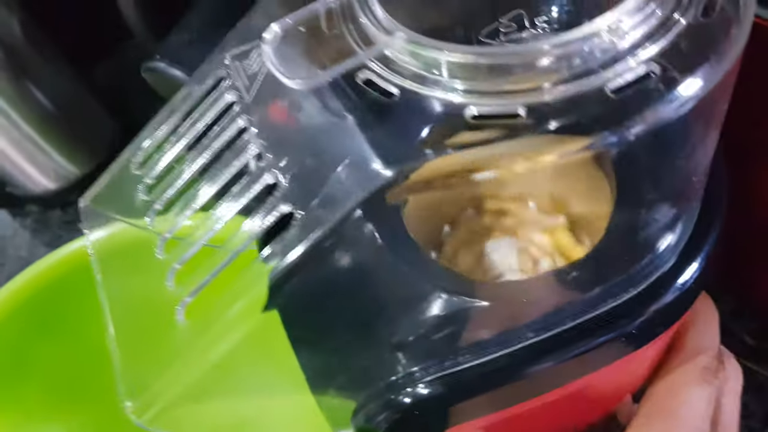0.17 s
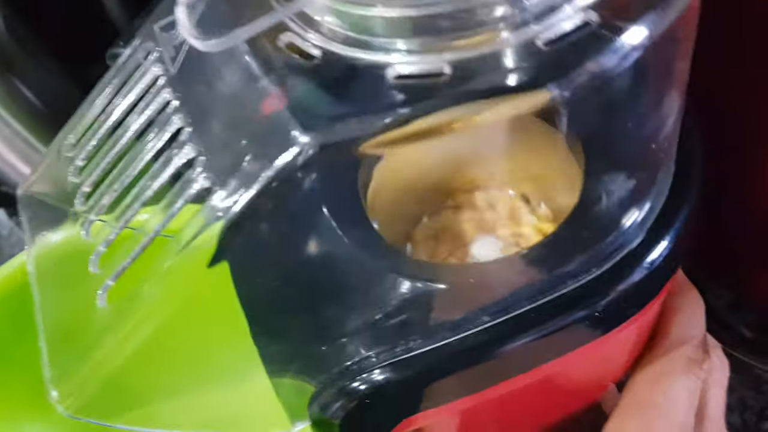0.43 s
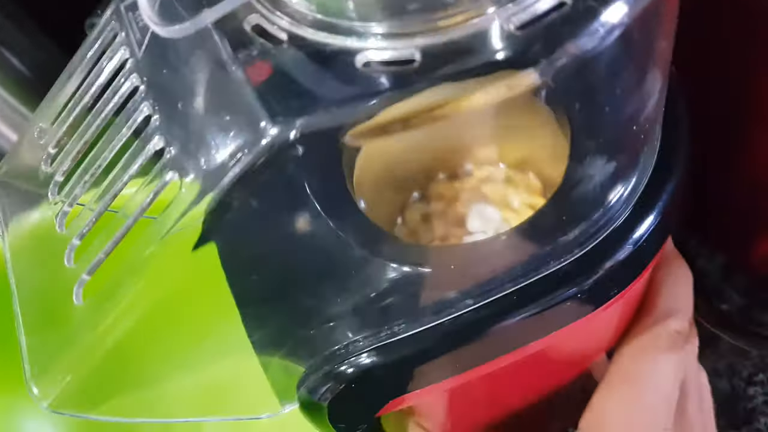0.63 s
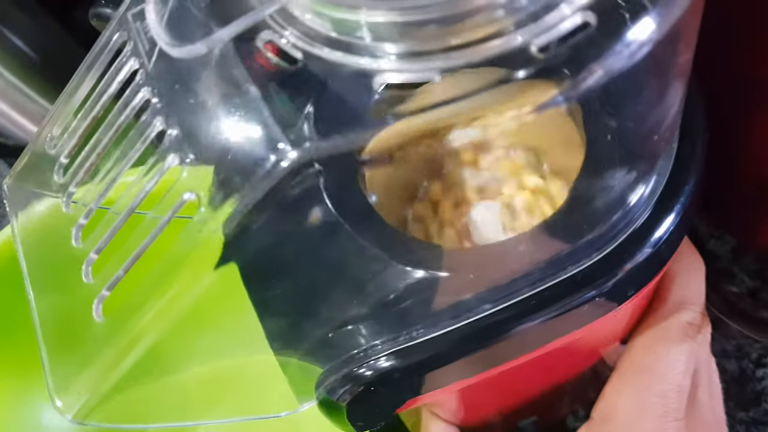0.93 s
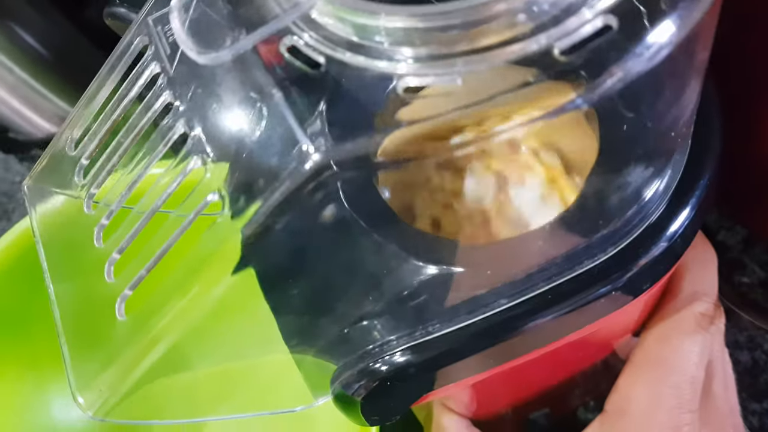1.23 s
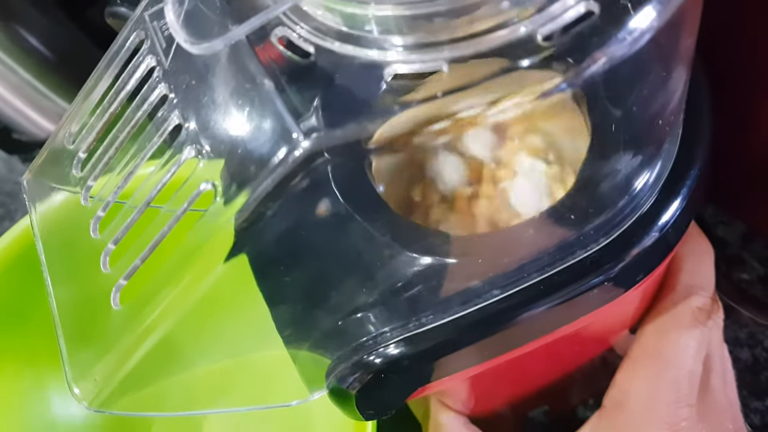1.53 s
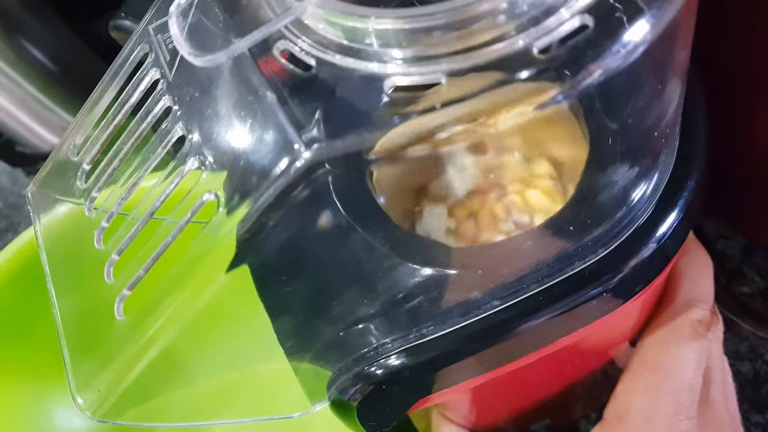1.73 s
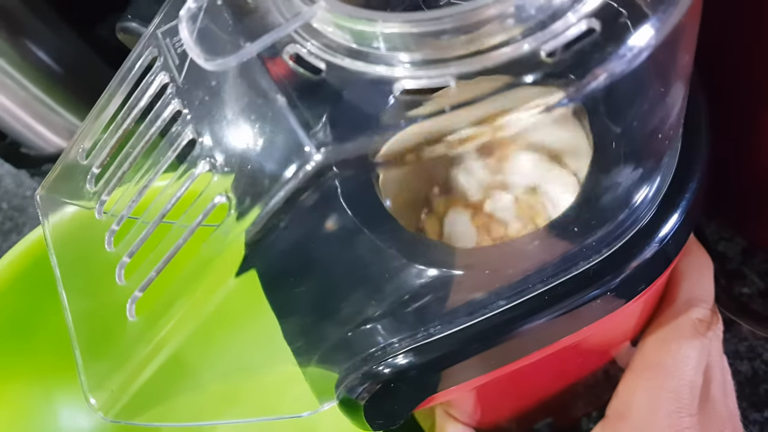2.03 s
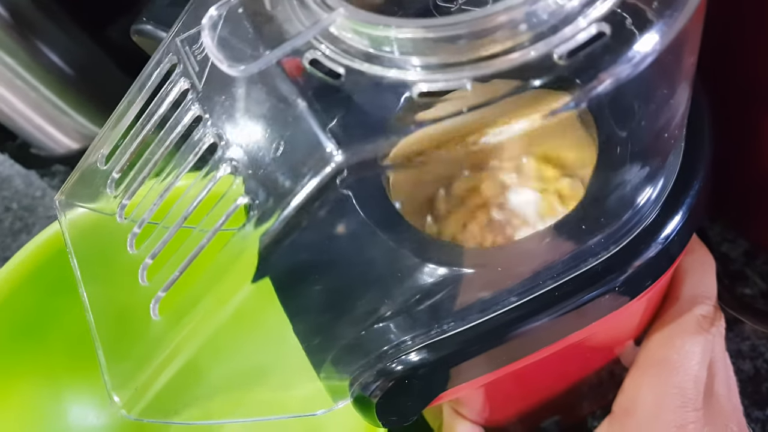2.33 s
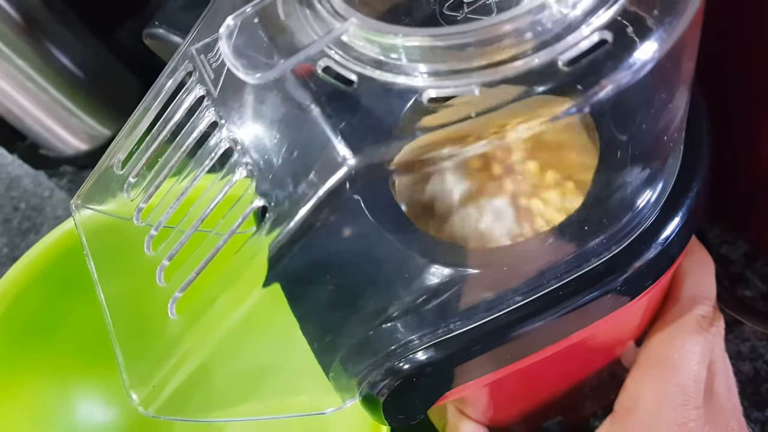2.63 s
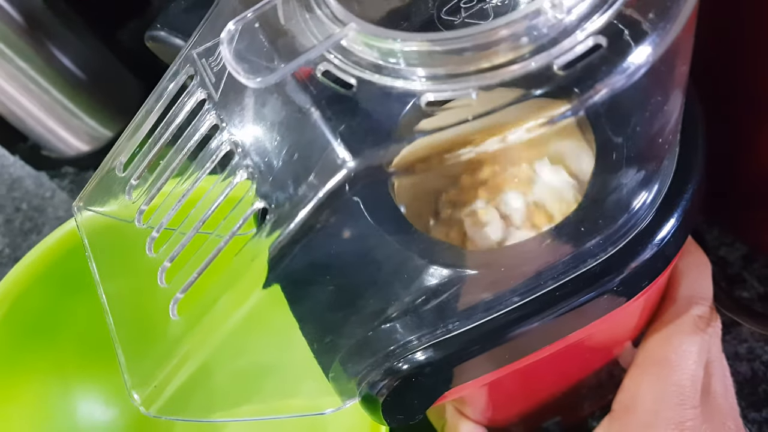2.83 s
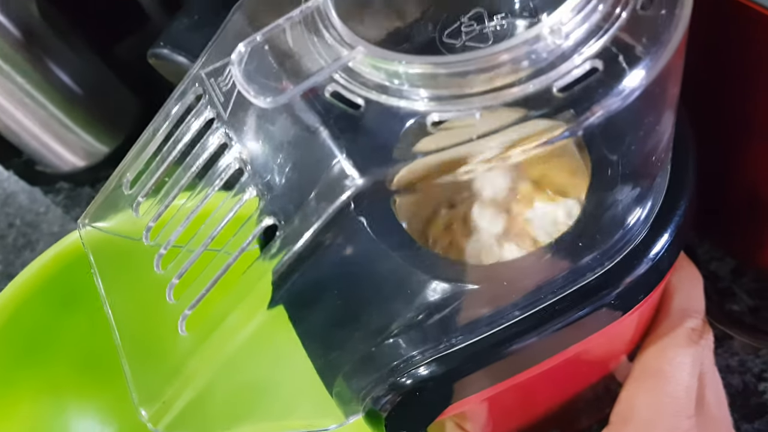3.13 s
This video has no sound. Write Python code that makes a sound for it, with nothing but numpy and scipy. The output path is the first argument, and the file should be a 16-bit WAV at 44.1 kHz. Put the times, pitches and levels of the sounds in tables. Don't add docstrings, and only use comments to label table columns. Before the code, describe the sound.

Close stereo pickup of a hot-air popcorn maker indoors: steady airy roar, pitched motor drone and fine kernel rattle. Three loud snapping pops come before midway, each squashing the level, then weaker snaps and recovery.

```python
import sys
import numpy as np
from scipy import signal
from scipy.fft import rfft, irfft
from scipy.io import wavfile

SR = 44100
rng = np.random.default_rng(int(sys.argv[2]) if len(sys.argv) > 2 else 0)


def convert_level_to_amplitude(level_db):
    exponent = np.asarray(level_db, float) / 20
    return 10 ** exponent


def transcribe(u):
    v = np.clip(np.atleast_2d(u).T, -1, 1)
    q = np.round(v * 32767).astype(np.int16)
    wavfile.write(sys.argv[1], SR, q)


N = 145089

# (time [s], level [dB])
RECORDER_GAIN = [(0, -24), (.25, -21), (.55, -19.5), (1.0, -18.5), (1.207, -18.5), (1.228, -29),
                 (1.245, -21), (1.315, -23), (1.335, -28), (1.36, -25), (1.5, -27.5), (1.525, -28),
                 (2.0, -29), (2.35, -29), (2.62, -27.5), (2.8, -23), (3.05, -20.5), (3.29, -20)]
# (frequency [Hz], density [dB per Hz])
RUMBLE_SPECTRUM = [(15, -42), (50, -35), (75, -23), (98, -11), (150, -12.5), (200, -12), (255, -4.5),
                   (330, -8)]
# (frequency [Hz], density [dB per Hz])
ROAR_SPECTRUM = [(330, -7), (480, -5.5), (600, -2.5), (800, 2), (1100, 0), (1500, -5), (1950, -5.5),
                 (2300, -16.5)]
# (frequency [Hz], density [dB per Hz])
HISS_SPECTRUM = [(1350, -71), (2300, -5), (4090, -1), (4890, -5), (5770, -13.5), (11400, -17), (14900, -22),
                 (15800, -20), (16400, -46)]
# (frequency [Hz], share [0-1])
SHARED_AIR = [(30, 0.5), (100, 0.93), (400, 1), (800, 0.86), (1300, 0.43), (1800, 0.81), (3000, 0),
              (15000, 0)]
# (frequency [Hz], lead [rad])
LEFT_LEAD = [(0, .1), (500, .4), (860, 1.1), (1000, -1.3), (1300, 0), (2070, 3.1), (2500, 9), (16000, 120)]
# (frequency [Hz], left-right [dB])
AIR_LEAN = [(30, 2), (100, 0), (350, .5), (600, 4), (780, -1), (1150, 7), (2400, 2), (15000, 1.5)]
# (multiple of the turning rate [1], left level [dB], right level [dB], left lead [rad],
# gain once the microphone has shifted [dB])
MOTOR_ORDERS = [(1, 0, 0, -.1, 0), (2, .8, -2.5, .6, -1.2), (3, -11, -6, 1.0, -3.0),
                (4, -12, -22, -1.2, -3.0), (5, -13, -15, .2, -1.5), (6, -11, -19, 2.0, 1.5),
                (7, -16, -19, -1.3, -4), (8, -29, -29, .3, 0), (9, -24, -27, .4, -4), (10, -28, -28, .3, 0),
                (13, -24, -24, .2, -3), (14, -27, -26, .3, 0), (15, -19, -15, 2.5, -4),
                (16, -24, -27, .7, 1), (17, -23, -23, 1.0, 9), (18, -32, -32, .3, 0),
                (20, -25, -22, -2.4, -6), (22, -41, -41, .3, 0), (30, -37, -37, .3, 0)]
# (frequency [Hz], width [Hz], level [dB], left-right [dB])
HOUSING_WHISTLES = [(763, 10.0, -9, -10), (808, 4.5, -14.5, 11), (911, 8, -31, 34), (666, 39, -17, 19),
                    (413.7, 23, -25.5, 14), (1716, 25, -29.5, 29), (2464, 60.0, -35, 36),
                    (6700, 230, -30.5, 10)]
# (time [s], peak [dB], centre [Hz], tail T60 [s], left-right [dB])
BURSTS = [
    (1.2205, -16.5, 11200, 0.39, 5),
    (1.3302, -13, 8800, 0.21, 3.5),
    (1.516, -13, 10000, .15, 4.5),
    (1.3410, -24, 4500, .03, 6),
    (1.5935, -29, 5500, .05, 2.5),
    (2.5868, -23, 10500, .05, 5),
    (2.594, -28, 13500, .04, 4),
    (2.7162, -30, 10000, .05, 2.5),
    (.435, -30, 13000, .08, 5),
]

MOTOR_HZ = 263.05


def column(rows, k, at):
    rows = np.array(rows, float)
    return np.interp(at, rows[:, 0], rows[:, k])


def at_hz(points, hz):
    points = np.array(points)
    return np.interp(np.log(hz), np.log(points[:, 0]), points[:, 1])


def rms_one(x):
    return x / np.sqrt(np.mean(x ** 2) + 1e-20)


def drift(rate):
    r = np.exp(-80 * np.pi * rate / SR)
    slow = signal.lfilter([1], [1, -2 * r, r * r], rng.standard_normal(N // 40 + 2002))
    slow = slow[2000:]
    return np.interp(np.arange(N) / 40, np.arange(len(slow)), rms_one(slow))


def resonate(x, hz, width):
    r = np.exp(-np.pi * width / SR)
    return signal.lfilter([1, 0, -1], [1, -2 * r * np.cos(2 * np.pi * hz / SR), r * r], x + 1e-18)


def panned(x, db):
    return x * convert_level_to_amplitude(np.array([[.5], [-.5]]) * db)


def shaft_angle():
    return 2 * np.pi * MOTOR_HZ * np.arange(N) / SR


def moving_air(spectrum, patchy_db):
    echo_s, echo_share = [[0.00141, .0031], [0.001225, .0038]], 0.13
    blade_depth = 0.05
    hz = np.maximum(np.arange(N // 2 + 1) * SR / N, 1)
    left, other = rfft(rng.standard_normal((2, N)))
    share = np.clip(at_hz(SHARED_AIR, hz), 0, 1)
    common = share * left * np.exp(-1j * column(LEFT_LEAD, 1, hz))
    pair = np.array([left, common + np.sqrt(1 - share ** 2) * other])
    pair = panned(pair * convert_level_to_amplitude(at_hz(spectrum, hz)), at_hz(AIR_LEAN, hz))
    echoes = 1 + echo_share * np.exp(-2j * np.pi * hz * np.array(echo_s)[..., None])
    pair = pair * np.abs(echoes).prod(axis=1)

    low, high = spectrum[0][0], spectrum[-1][0]
    centres = np.linspace(np.log(low), np.log(high), 10)
    inside = (hz >= low) * (hz < high)
    out, together = 0, drift(1.0)
    for k in range(len(centres)):
        band = np.sqrt(np.interp(np.log(hz), centres, np.arange(len(centres)) == k)) * inside
        flicker = convert_level_to_amplitude(patchy_db * (0.29 * together + drift(10.3)))
        out = out + flicker * irfft(pair * band, N)
    return rms_one(out) * (1 + blade_depth * np.cos(shaft_angle()))


def fan():
    rumble = convert_level_to_amplitude(-19.5) * moving_air(RUMBLE_SPECTRUM, patchy_db=4.0)
    roar = convert_level_to_amplitude(-1) * moving_air(ROAR_SPECTRUM, patchy_db=0.87)
    hiss = convert_level_to_amplitude(-6.5) * moving_air(HISS_SPECTRUM, patchy_db=1.0)
    return rumble + roar + hiss


def whistles():
    narrow_hz, steadying = 20, .6
    out = 0
    for hz, width, db, pan_db in HOUSING_WHISTLES:
        tone = resonate(resonate(rng.standard_normal(N), hz, width), hz, width)
        if width < narrow_hz:
            envelope = np.abs(signal.hilbert(tone)) + 1e-9
            tone = tone / envelope ** steadying
        out = out + convert_level_to_amplitude(db) * panned(rms_one(tone), pan_db)
    return out


def hum():
    waver_db, waver_growth, waver_top_db, waver_per_s = .12, 1.3, 2.2, 5
    phase_wander = .006
    shift_s, shift_takes_s = 2.55, .35
    early_dip_db, early_s = -6, 0.25
    t, angle = np.arange(N) / SR, shaft_angle()
    shifted = np.clip((t - shift_s) / shift_takes_s, 0, 1)
    out = np.zeros((2, N))
    for order, left_db, right_db, lead, shift_db in MOTOR_ORDERS:
        k = round(order)
        phase = k * angle + phase_wander * k * drift(0.7) - (k > 1) * np.pi / 2
        depth_db = np.minimum(waver_db * k ** waver_growth, waver_top_db)
        level_db = depth_db * drift(waver_per_s) + shift_db * shifted
        if k == 1:
            level_db = level_db + early_dip_db * np.exp(-t / early_s)
        ports = convert_level_to_amplitude(np.array([[left_db], [right_db]]))
        out += np.sqrt(2) * convert_level_to_amplitude(level_db) * ports * np.cos(phase + np.array([[.5], [-.5]]) * lead)
    return out


def ticks():
    ticks_per_s, level_db, ring_cycles = 170, -18.5, 24
    sizes = convert_level_to_amplitude(1.7 * np.minimum(rng.exponential(1, N), 3.0)) * rng.choice([-1, 1], N)
    struck = rng.random(N) < ticks_per_s / SR
    spot = rng.integers(0, 12, N)
    out = 0
    for k, hz in enumerate(np.geomspace(2700, 7500, 12)):
        ring = resonate(sizes * struck * (spot == k), hz, 0.94 * hz / ring_cycles)
        out = out + panned(ring, 18.0 * np.sin(k * k))
    return convert_level_to_amplitude(level_db) * rms_one(out)


def pops():
    rise_s, octaves = .00015, 0.98
    spike_db, spike_t60_s, crack_t60_s, tail_db = -5, .007, .035, -13
    snap_db, snap_hz = 6, 1100
    thump_db, thump_hz, thump_t60_s = -1, 85, .09
    out, t = np.zeros((2, N + SR)), np.arange(SR // 2) / SR
    for s, db, hz, t60, pan_db in BURSTS:
        edges = np.clip(hz * 2 ** (np.array([-.5, .5]) * octaves), 500, .44 * SR)
        band = signal.butter(3, edges, "band", fs=SR, output="sos")
        noise = rms_one(signal.sosfilt(band, rng.standard_normal((2, len(t)))))
        spike = convert_level_to_amplitude(spike_db - 60 * t / spike_t60_s)
        crack = convert_level_to_amplitude(-60 * t / crack_t60_s)
        steam = convert_level_to_amplitude(tail_db - 60 * t / t60)
        shape = (1 - np.exp(-t / rise_s)) * (spike + crack + steam)
        swing = np.cos(2 * np.pi * snap_hz * t + np.arctan(2 / np.pi))
        snap = -convert_level_to_amplitude(snap_db) * np.exp(-t * snap_hz * 4) * swing
        thump = t60 ** 2 * convert_level_to_amplitude(thump_db - 60 * t / thump_t60_s) * np.sin(2 * np.pi * thump_hz * t)
        level = convert_level_to_amplitude(db - column(RECORDER_GAIN, 1, s))
        i = int(s * SR)
        out[:, i:i + len(t)] += level * panned(shape * noise + snap + thump, pan_db)
    return out[:, :N]


def scene():
    return fan() + whistles() + hum() + ticks() + pops()


def roll_off(x):
    return signal.sosfilt(signal.butter(12, 16500, fs=SR, output="sos"), x)


def record(dry):
    x = dry * convert_level_to_amplitude(column(RECORDER_GAIN, 1, np.arange(N) / SR))
    limited = 1.5 * np.tanh(x / 1.5)
    top_cut = signal.cheby2(14, 24, 15900, fs=SR, output="sos")
    return roll_off(signal.sosfilt(top_cut, limited))


dry = scene()
out = record(dry)
transcribe(out)
```